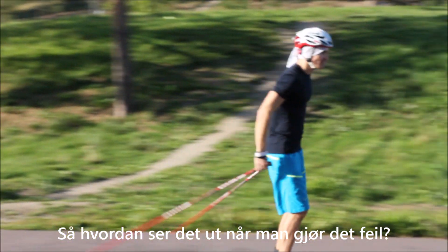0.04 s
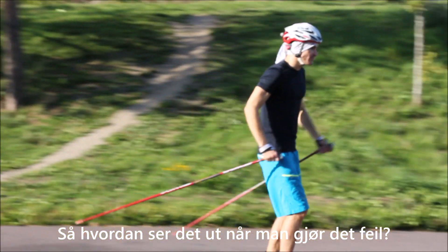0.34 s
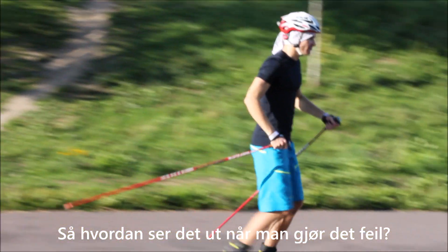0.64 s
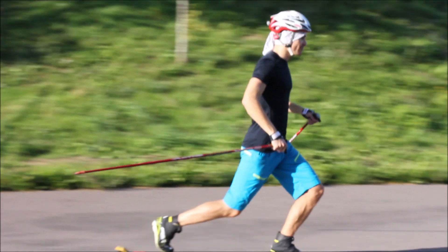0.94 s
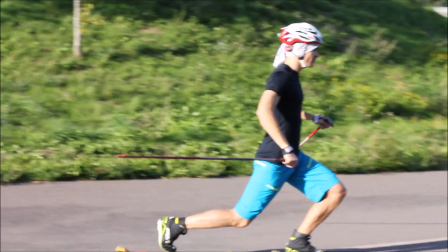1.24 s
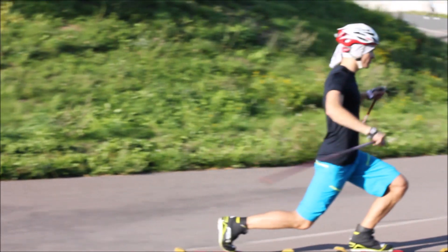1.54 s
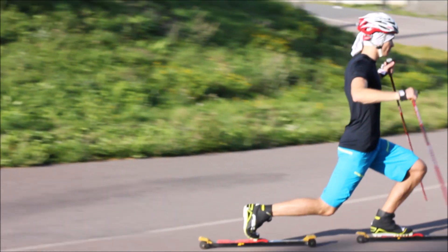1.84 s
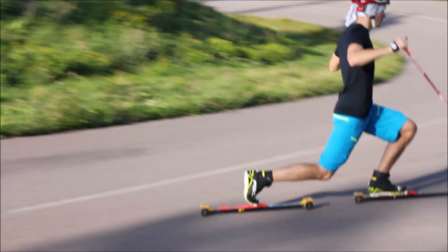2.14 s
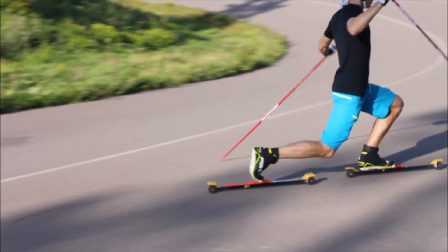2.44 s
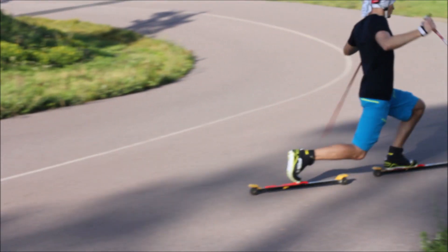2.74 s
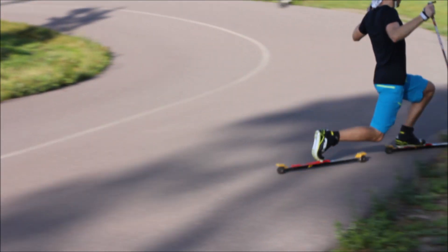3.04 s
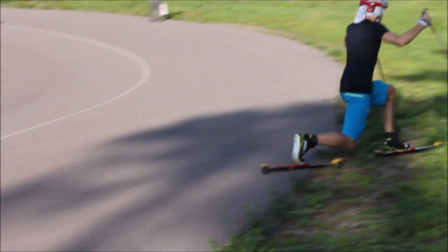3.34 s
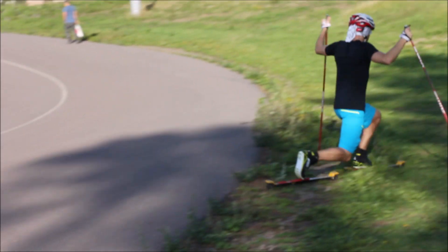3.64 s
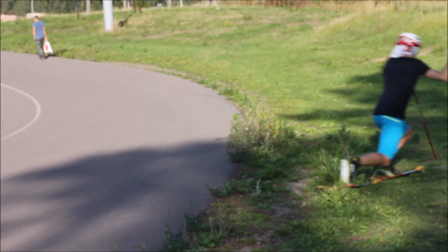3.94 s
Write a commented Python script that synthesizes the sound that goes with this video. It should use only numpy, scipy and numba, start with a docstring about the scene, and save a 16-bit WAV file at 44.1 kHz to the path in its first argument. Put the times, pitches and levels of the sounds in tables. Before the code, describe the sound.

Roller skis roll along a paved path with a gritty, ringing whir and small knocks. A pole tip scrapes and ticks sharply on the asphalt, then the skis clatter over the edge and thump onto grass, close to the microphone.

```python
"""Roller skis glide on a paved path: asphalt grit drums the wheels and rings the shafts, over a low hum.
Stones knock the wheels. A pole is planted, skips and chatters over the tarmac, and its hard tip ticks.
Then the skis knock over the edge of the road and rattle onto grass, which thumps the wheels.
The close microphone's limiter ducks after the sharpest ticks."""
import sys
import numpy as np
from scipy import signal
from scipy.fft import rfft, irfft
from scipy.io import wavfile
from scipy.ndimage import uniform_filter1d, minimum_filter1d, map_coordinates
from numba import njit

SR = 44100
rng = np.random.default_rng(int(sys.argv[2]) if len(sys.argv) > 2 else 0)


def transcribe(signal):
    """Save signal, clipped to [-1, 1], as a 16-bit WAV file at the path in sys.argv[1]."""
    frames = np.atleast_2d(signal).T
    limited = np.clip(frames, -1, 1)
    pcm = np.round(limited * 32767).astype(np.int16)
    wavfile.write(sys.argv[1], SR, pcm)


N = 176400

# Rolling levels. Each row: time in seconds, then rumble, shaft ring, upper ring and hiss in dB.
ROLL_LEVELS = [(0, -39, -31, -38.5, -43.5), (0.2, -39.5, -27.5, -33, -38), (0.31, -40.5, -30, -39.5, -41),
               (0.37, -44, -29, -40, -39), (0.52, -43, -32.5, -43.0, -43), (0.62, -43, -32.5, -44, -41),
               (0.76, -42.5, -30, -45.5, -35.0), (0.88, -41.5, -31.5, -49, -39.0),
               (1.0, -41.5, -27.5, -36, -37.5), (1.2, -42, -29.5, -38.5, -38),
               (1.5, -42.5, -27.5, -36.5, -39), (1.93, -42, -28.5, -33.5, -37),
               (2.35, -46, -31.5, -36, -41.5), (2.42, -42.5, -30.0, -35, -38),
               (2.48, -42, -24.5, -32.5, -35), (2.66, -45.5, -33.5, -37, -41.5),
               (2.85, -42.5, -30, -35, -42), (3.0, -45.5, -28.5, -38, -40.5),
               (3.12, -36, -24.5, -33.5, -41), (3.24, -45, -31.5, -41, -42), (3.31, -35, -25, -33, -31.5),
               (3.38, -41.5, -33.5, -44, -42.5), (3.5, -45, -32.5, -43, -45.5), (3.6, -41.5, -33, -47, -42),
               (3.72, -43.5, -37.5, -51.5, -47.5), (3.91, -45.5, -40, -49.5, -45),
               (3.99, -44, -35.5, -46, -45.0)]
# Spectra of those four parts. Each row: frequency in Hz, gain in dB.
RUMBLE_SPECTRUM = [(25, -45), (50, -7), (110, -3.5), (170, -0.5), (260, -2), (400, -8.5), (560, 4),
                   (680, 0.5), (800, -4.5), (1050, 0), (1400, -18.5)]
SHAFT_SPECTRUM = [(800, -40), (1150, -10.5), (1400, -4), (1650, -3.5), (1950, -6), (2250, 0), (2600, -4),
                  (2900, -14), (3500, -38)]
UPPER_SPECTRUM = [(2400, -24.5), (2950, -0.5), (3300, 2), (3800, -9.5), (4250, 3), (4550, 1), (5050, 1),
                  (5500, -15), (6300, -19.5)]
HISS_SPECTRUM = [(4500, -20), (5800, -18), (6300, -3), (6750, 2.5), (7200, -2.5), (7900, -7), (8600, 3),
                 (9600, 2), (11600, 5), (12500, -10), (13400, -1.5), (14800, -2.5), (16000, -30)]
# Main shaft resonance, shifting with stance. Each row: time in seconds, frequency in Hz.
SHAFT_PITCH = [(0, 1730), (.33, 1770), (.6, 1820), (1.5, 1816), (2.3, 1824), (3.05, 1810), (4, 1700)]
# Resonances of a loaded ski. Each row: start and end in seconds, first and last centre in Hz,
# width in Hz, level in dB.
LOADED_RINGS = [(-.07, 0.297, 1550, 1710, 350, -26.5), (0.17, 0.38, 3410, 3390, 440, -36),
                (0.4, 0.34, 4850, 4860, 300, -39.5), (0.7, 0.903, 3100, 3390, 570, -39),
                (.72, 1.1, 5030, 4950, 520, -44.5), (0.96, 1.448, 4660, 4420, 230, -41.5),
                (1.47, 2.12, 4560, 4560, 140, -36), (1.6, 2.026, 2450, 2440, 590, -35),
                (0.5, 2, 9450, 9350, 560, -48), (2.5, 3.366, 1785, 1837, 190, -30),
                (2.5, 3.252, 2190, 2180, 350, -31.5), (3, 3.303, 3300, 3180, 260, -41.5),
                (3, 3.37, 4650, 4530, 420, -39), (3.4, 3.893, 2000, 2310, 310, -41.5),
                (3.5, 3.946, 4400, 4510, 380, -53)]
# Low hum. Each row: time in seconds, frequency in Hz, level in dB.
HUM_TRACK = [(0, 92.5, -47.5), (.33, 90.2, -47.5), (.5, 86, -55), (.72, 86, -54), (.9, 85.6, -75)]
# Wheel drone. Each row: time in seconds, level in dB.
DRONE_LEVELS = [(0, -55.5), (1.05, -55), (1.3, -43.5), (1.5, -48.5), (1.72, -57), (1.9, -46.5), (2.1, -62)]
# Wheel knocks. Each row: start in seconds, ring peak in dB, relative thud in dB,
# upper-mode gain in dB, force decay in seconds.
WHEEL_KNOCKS = [(0.032, -23, -23, -12, .001), (0.079, -11.5, -25, -10, 0.0016),
                (.083, -17, -27, -4, 0.00059), (.18, -17, -20, 0, 0.00089), (.422, -16, -18, 4, 0.0068),
                (.835, -18, -22, -1, .002), (0.9608, -12.5, -32, -11, 0.002),
                (2.466, -12.5, -30, -4, 0.0015), (2.4944, -9, -26, -6, 0.0013),
                (3.0663, -4, -10.5, -12, 0.0016), (3.074, -9.5, -15, -10, 0.0013),
                (3.309, -20, -8, 5, .003), (3.3235, -1.5, -20.5, 4.5, .0018), (3.3392, -10, -19, -8, .0015),
                (3.456, -18.5, -24, 4, .0053), (3.468, -13.5, -14, 1.5, 0.0041),
                (3.569, -16, -8, -7, 0.0073), (3.856, -24.5, -14, 3, .0037), (3.962, -18.5, -7, -2, 0.006)]
# Ski modes. Each row: frequency in Hz, level in dB, 60 dB decay time in seconds.
SKI_RESONANCES = [(1833, 0, 0.027), (2160, -1, 0.017), (3110, -8.5, 0.013), (4650, -14.5, .014),
                  (4760, -9.5, 0.011), (10600, -21, 0.0017)]
# Wheel thud. Each row: frequency in Hz, gain in dB.
THUD_SPECTRUM = [(50, -18), (110, -10), (200, 2), (330, 1), (650, -3.5), (1100, -0.5), (1800, 3),
                 (4000, -59)]
# Pole plant and skips. Each row: start in seconds, level in dB, force decay in seconds.
POLE_STRIKES = [(1.9858, 6, 0.0013), (1.9894, -6, 0.00089), (1.9971, -5, 0.00092), (2.0553, -10, .001),
                (2.0581, -2, 0.00065), (2.0636, -7.5, 0.00051), (2.0659, -7, .0008), (2.0686, -7, 0.00087),
                (2.0906, -4.5, 0.00044), (2.0984, -6, 0.00046), (2.1005, -4.5, 0.0009),
                (2.1056, -5, 0.0014), (2.1126, -6.5, .0007), (2.123, -9, 0.0011), (2.127, -10, 0.00078),
                (2.1435, -7, 0.0011), (2.156, -5.5, 0.00061), (2.1606, -7.5, .0008), (2.181, -9, 0.00083),
                (2.1837, -5, 0.0011), (2.194, -10, .0006), (2.2037, -7, .0006), (2.2126, -10, 0.0011)]
# Tip chatter. Each row: time in seconds, level in dB, share of shaft ring from 0 to 1.
CHATTER_TRACK = [(2.119, -41, 0.06), (2.125, -23.5, 0), (2.15, -21, 0), (2.172, -20, 0.44),
                 (2.19, -17.5, 1), (2.22, -20, 0.99), (2.25, -21, 1), (2.285, -25, 0.97), (2.305, -56, 0.7)]
# Pole contact, pole shaft ring and tip scratch. Each row: frequency in Hz, gain in dB.
CONTACT_SPECTRUM = [(150, -48), (350, -28.5), (600, -7), (900, 0.5), (1250, 1), (1600, 11), (2100, -3.5),
                    (2600, 0), (3200, -8.5), (4600, -7.5), (5800, -18.5), (7900, -19.5), (10000, -9.5),
                    (12500, -25), (14500, -28), (17000, -32)]
POLE_RING_SPECTRUM = [(200, -43), (500, -32), (900, -4), (1300, -21), (1750, 13), (2150, 0.5), (2600, 3.5),
                      (3300, -2), (4000, -15), (5000, -19), (7000, -40), (11000, -26), (16000, -33)]
SCRATCH_SPECTRUM = [(2000, -28), (3000, 2), (4000, -5), (4700, 1), (5600, -3), (6800, -4), (8000, -16),
                    (10000, -4), (11500, -4), (13000, -18), (16000, -24)]
# Tip ticks. Each row: start in seconds, tick peak in dB, relative clack in dB.
TIP_TICKS = [(2.4948, -10, -7), (2.505, -6.5, 0.5), (2.5546, 2.5, 4.5), (2.5594, 9, -19), (2.5654, 1, -11),
             (2.6015, -4, -26), (2.6037, 11.5, -19), (2.6123, 10.5, -12.5), (2.6143, 4, -15),
             (3.417, -6.5, -22), (3.4181, -4, -15)]
# Bright tick and lower clack. Each row: frequency in Hz, gain in dB.
TICK_SPECTRUM = [(1500, -46.5), (4000, -29), (6000, -14), (6480, -4.5), (7100, -19.5), (8600, -3),
                 (9100, 1.5), (9550, -2.5), (10150, 3), (10700, -2), (11300, 2.5), (12400, -14),
                 (15000, -16), (17000, -41.5)]
CLACK_SPECTRUM = [(400, -42.5), (1300, -34.5), (1900, -26), (3100, -15), (4100, -6.5), (4700, 4),
                  (5500, -12.5), (6400, 1), (7600, -19), (12000, -28)]
# Turf bumps. Each row: time in seconds, level in dB.
TURF_LEVELS = [(3.3, -73), (3.328, -40.5), (3.36, -64), (3.54, -63), (3.59, -41.5), (3.7, -50), (3.85, -53),
               (4, -42)]
# Wheels on turf. Each row: frequency in Hz, gain in dB.
TURF_SPECTRUM = [(25, -15), (50, -8), (110, 3), (170, -1.5), (250, 2), (380, -4), (520, -2), (900, -18),
                 (2000, -42)]

TIME_S = np.arange(N) / SR


def undb(db):
    """Decibels to gain."""
    return 10 ** (np.asarray(db) / 20)


def unit(x):
    """Scale to rms 1."""
    return x / np.sqrt(np.mean(x ** 2))


def curve(table, column=1):
    """One table column, interpolated over time."""
    rows = np.array(table, float)
    return np.interp(TIME_S, rows[:, 0], rows[:, column])


def walk(rate_hz):
    """Random wander, rms 1."""
    knots = rng.standard_normal(N // 20)
    return unit(map_coordinates(knots, [TIME_S * rate_hz], order=1, mode="wrap"))


def colour(x, spectrum, size=2048):
    """Minimum-phase filter with the given spectrum."""
    hz, db = np.array(spectrum, float).T
    bins_hz = np.arange(size // 2 + 1) * SR / size
    gain = undb(np.interp(np.log(bins_hz + 1), np.log(hz), db))
    cepstrum = irfft(np.log(gain))
    cepstrum[1:size // 2] *= 2
    cepstrum[size // 2 + 1:] = 0
    impulse = irfft(np.exp(rfft(cepstrum)))
    return signal.fftconvolve(x, impulse)[:len(x)]


@njit
def resonate(x, hz, width_hz):
    """State-variable band-pass with a moving centre."""
    y, band_state, low_state = np.empty(len(x)), 0., 0.
    for i in range(len(x)):
        g, damping = np.tan(np.pi * hz[i] / SR), width_hz / hz[i]
        band = (band_state + g * (x[i] - low_state)) / (1 + g * (g + damping))
        band_state = 2 * band - band_state
        low_state += 2 * g * band
        y[i] = damping * band
    return y


def narrow(x, hz, width_hz):
    """Two band-passes in series, rms 1."""
    centre_hz = np.full(N, hz, float)
    once = resonate(x, centre_hz, float(width_hz))
    return unit(resonate(once, centre_hz, float(width_hz)))


def crunch(decay_s, tail_s=0.0084, tail_db=-22, snap=0, size=4096):
    """Force of a gritty contact: optional snap, fast burst, faint tail."""
    t = np.arange(size) / SR
    envelope = np.exp(-t / decay_s) + undb(tail_db) * np.exp(-t / tail_s)
    return snap * (t == 0) + rng.choice([-1., 1.], size) * envelope


def strike(force, spectrum):
    """A body's response to a force, peak 1."""
    response = colour(force, spectrum)
    return response / np.abs(response).max()


def add(out, start_s, sound):
    """Mix a sound in at its time."""
    i = max(int(start_s * SR), 0)
    out[i:i + len(sound)] += sound[:N - i]


def grit(spread_db, grains_per_s=5200):
    """Dense tiny impacts of asphalt grains, a few larger than the rest."""
    hits = (rng.random(N) < grains_per_s / SR) * rng.choice([-1., 1.], N)
    return hits * undb(spread_db * np.minimum(rng.exponential(size=N), 4))


def rolling(load_db, jolt_db):
    """Grit, pressed harder by each jolt, drives the ski's rumble, rings and hiss."""
    body = colour(grit(spread_db=2) * undb(load_db), SHAFT_SPECTRUM)
    resonance = narrow(body, curve(SHAFT_PITCH), width_hz=594)
    shaft = unit(body) + undb(-5) * resonance
    rumble = colour(rng.standard_normal(N) * undb(0.6 * load_db), RUMBLE_SPECTRUM)
    upper = colour(grit(spread_db=2.5) * undb(1.33 * load_db), UPPER_SPECTRUM)
    crackle = unit(grit(spread_db=8)) + rng.standard_normal(N)
    hiss = colour(crackle * undb(0.6 * jolt_db), HISS_SPECTRUM)
    return sum(unit(part) * undb(curve(ROLL_LEVELS, column))
               for column, part in enumerate([rumble, shaft, upper, hiss], start=1))


def ski_rings(load_db, fade_s=0.051):
    """Resonances sing out while a ski carries the weight."""
    out = np.zeros(N)
    for start_s, end_s, from_hz, to_hz, width_hz, db in LOADED_RINGS:
        inside_s = np.minimum(TIME_S - start_s, end_s - TIME_S)
        swell = np.sqrt(np.clip(inside_s / fade_s, 0, 1))
        drive = rng.standard_normal(N) * undb(0.52 * load_db)
        centre_hz = np.interp(TIME_S, [start_s, end_s], [from_hz, to_hz])
        out += undb(db) * swell * narrow(drive, centre_hz, width_hz)
    return out


def low_hum():
    """A wavering tone sags in pitch and fades early."""
    phase = 2 * np.pi * np.cumsum(curve(HUM_TRACK)) / SR
    level_db = curve(HUM_TRACK, column=2) + 1.7 * walk(rate_hz=13)
    return np.sqrt(2) * np.sin(phase) * undb(level_db)


def wheel_drone():
    """The wheels drone in a narrow band, swelling during the lunge."""
    return narrow(rng.standard_normal(N), hz=183.9, width_hz=18.6) * undb(curve(DRONE_LEVELS))


def wheel_knocks(upper_from_hz=2800, low_cut_hz=1200, thud_extra_s=0.0059):
    """Stones and the road's edge ring the ski's modes and thud through the wheels."""
    out = np.zeros(N)
    low_cut = signal.butter(3, low_cut_hz, "high", fs=SR, output="sos")
    for start_s, db, thud_db, upper_db, decay_s in WHEEL_KNOCKS:
        force = crunch(decay_s, snap=7)
        t = np.arange(len(force)) / SR
        modes = np.zeros(len(t))
        for hz, mode_db, t60_s in SKI_RESONANCES:
            gain = undb(mode_db + upper_db * (hz > upper_from_hz))
            modes += gain * np.sin(2 * np.pi * hz * t) * undb(-60 * t / t60_s)
        ring = signal.sosfilt(low_cut, signal.fftconvolve(force, modes)[:len(t)])
        thud = strike(crunch(decay_s + thud_extra_s), THUD_SPECTRUM)
        add(out, start_s, undb(db) * (ring / np.abs(ring).max() + undb(thud_db) * thud))
    return out


def pole_strikes():
    """The pole lands and skips; late strikes ring its shaft more."""
    out = np.zeros(N)
    ring_share = curve(CHATTER_TRACK, column=2)
    for start_s, db, decay_s in POLE_STRIKES:
        force = crunch(decay_s, snap=3.4)
        share = ring_share[int(start_s * SR)]
        contact, ring = strike(force, CONTACT_SPECTRUM), strike(force, POLE_RING_SPECTRUM)
        add(out, start_s, undb(db) * ((1 - share) * contact + share * ring))
    return out


def pole_chatter(slips_per_s=215, jitter=0.3, spread_db=0.5, scratch_db=-5.5):
    """The tip sticks and slips on asphalt; a bright scrape gives way to shaft ring."""
    start_s, end_s = CHATTER_TRACK[0][0], CHATTER_TRACK[-1][0]
    gap_draws, size_draws = rng.standard_normal((N // 1000, 2)).T
    times_s = start_s + np.cumsum(np.exp(jitter * gap_draws)) / slips_per_s
    slips = np.zeros(N)
    for time_s, slip_db in zip(times_s, spread_db * size_draws):
        force = crunch(decay_s=0.0006, tail_db=-17)
        if time_s < end_s:
            add(slips, time_s, undb(slip_db) * force)
    scratch = unit(colour(slips * rng.standard_normal(N), SCRATCH_SPECTRUM))
    scrape = unit(colour(slips, CONTACT_SPECTRUM)) + undb(scratch_db) * scratch
    ring = unit(colour(slips, POLE_RING_SPECTRUM))
    ring_share = curve(CHATTER_TRACK, column=2)
    chatter = np.sqrt(1 - ring_share) * scrape + np.sqrt(ring_share) * ring
    duty = (end_s - start_s) / (N / SR)  # refers the rms to the chatter's own span
    return chatter * np.sqrt(duty) * undb(curve(CHATTER_TRACK))


def tip_ticks():
    """The hard tip snaps against stone; some hits also clack lower down."""
    out = np.zeros(N)
    for start_s, db, clack_db in TIP_TICKS:
        force = crunch(decay_s=0.00047, tail_s=0.0044, tail_db=-25)
        tick, clack = strike(force, TICK_SPECTRUM), strike(force, CLACK_SPECTRUM)
        add(out, start_s, undb(db) * (tick + undb(clack_db) * clack))
    return out


def turf_bumps(bump_db=3.5):
    """Off the road, lumpy ground thumps the wheels."""
    push = rng.standard_normal(N) * undb(bump_db * walk(rate_hz=35))
    return unit(colour(push, TURF_SPECTRUM)) * undb(curve(TURF_LEVELS))


def scene():
    """Skis and pole, mono; road jolts and slower sway vary the load on the skis."""
    jolt_db = 1.57 * walk(rate_hz=150)
    sway_db = 1.51 * walk(rate_hz=35)
    load_db = jolt_db + sway_db
    glide = rolling(load_db, jolt_db) + ski_rings(load_db) + low_hum() + wheel_drone()
    pole = pole_strikes() + pole_chatter() + tip_ticks()
    bumps = wheel_knocks() + turf_bumps()
    return (glide + pole + bumps)[None]


def record(dry):
    """A treble-sensitive limiter clamps at once and recovers slowly; clipping and a low-pass follow."""
    threshold_db, release_db_per_s, treble_weight, top_hz = 4.5, 40, 0.94, 15700
    sensed = dry + treble_weight * np.diff(dry, axis=1, prepend=0)
    over_db = np.maximum(20 * np.log10(np.abs(sensed) + 1e-9) - threshold_db, 0)
    recovery_db = release_db_per_s * TIME_S
    duck_db = np.maximum.accumulate(over_db + recovery_db, axis=1) - recovery_db
    gain_db = uniform_filter1d(minimum_filter1d(-duck_db, size=16), size=16)
    clipped = np.clip(dry * undb(gain_db), -1, 1)
    low_pass = signal.ellip(8, 0.2, 70, top_hz, fs=SR, output="sos")
    return signal.sosfilt(low_pass, clipped)


dry = scene()
out = record(dry)
transcribe(out)
```